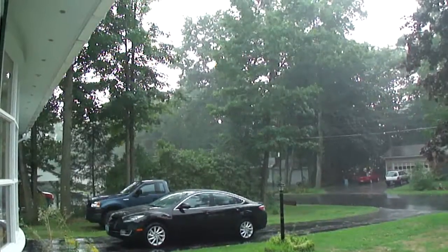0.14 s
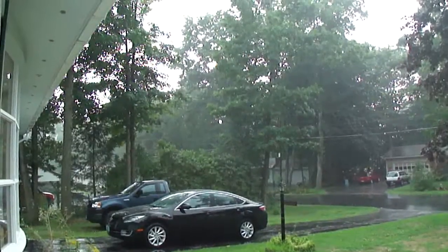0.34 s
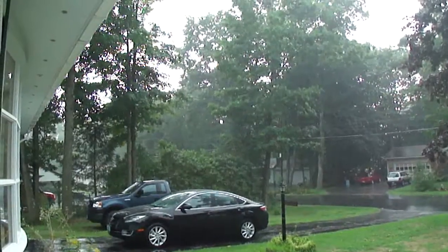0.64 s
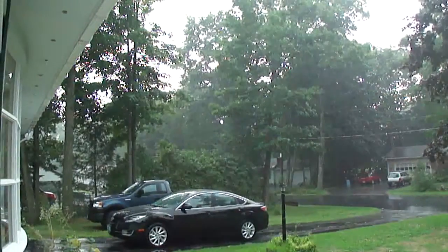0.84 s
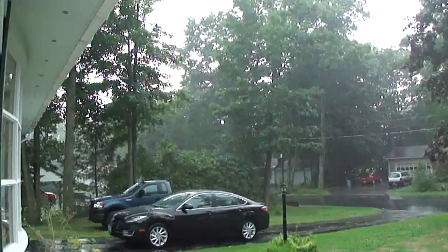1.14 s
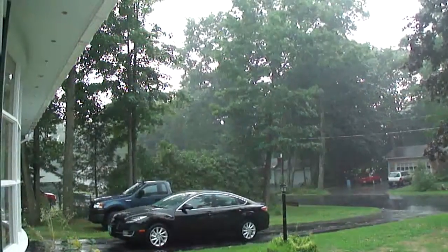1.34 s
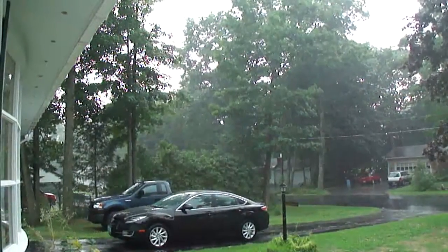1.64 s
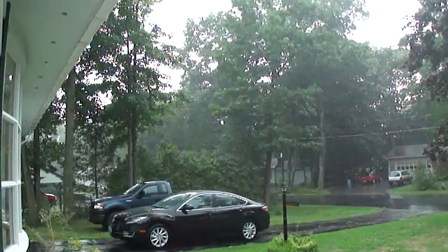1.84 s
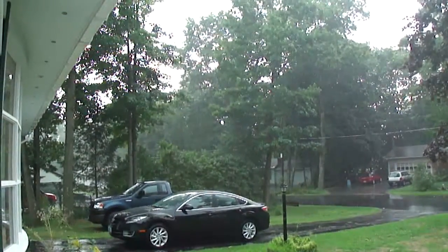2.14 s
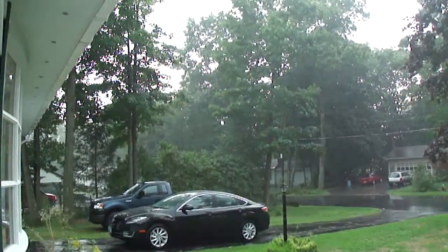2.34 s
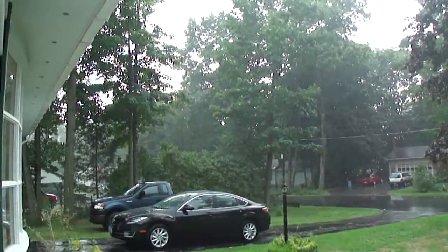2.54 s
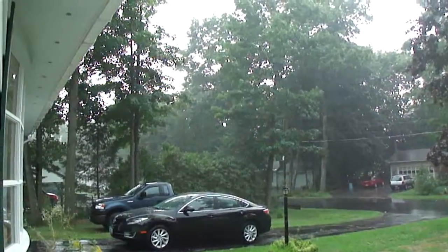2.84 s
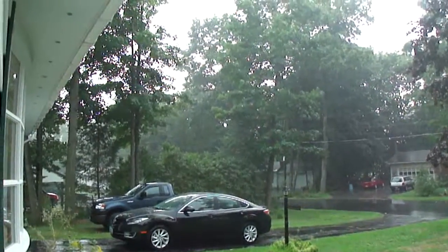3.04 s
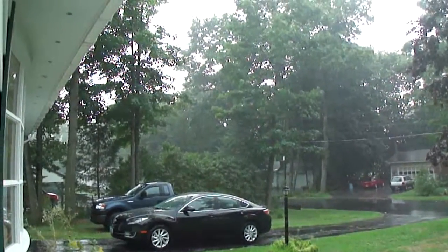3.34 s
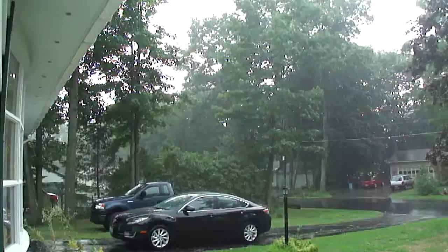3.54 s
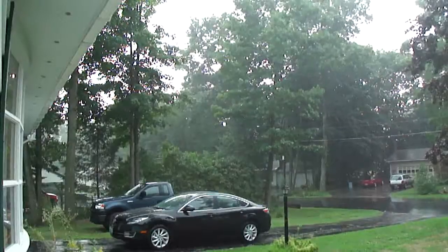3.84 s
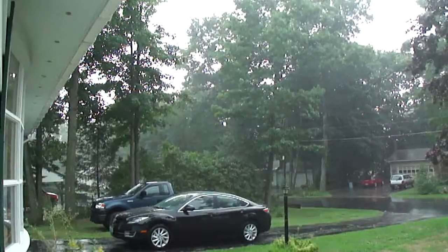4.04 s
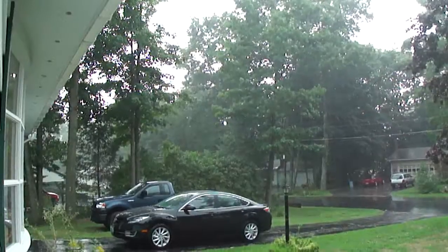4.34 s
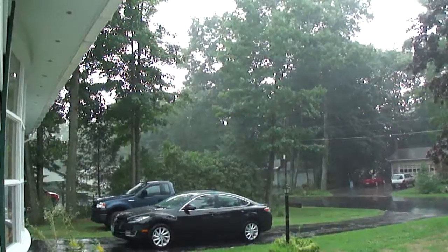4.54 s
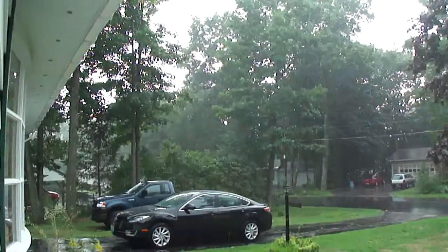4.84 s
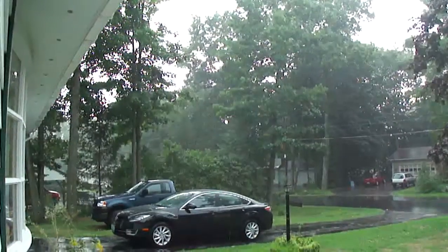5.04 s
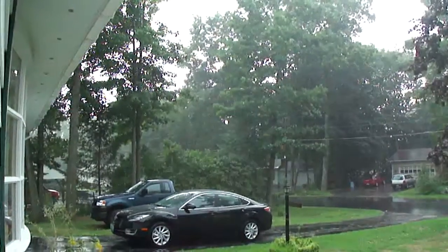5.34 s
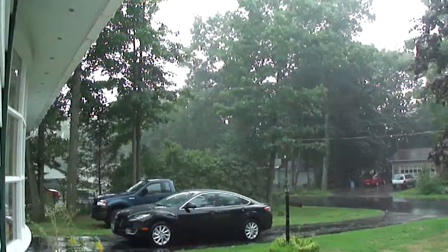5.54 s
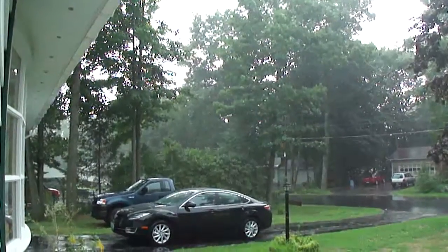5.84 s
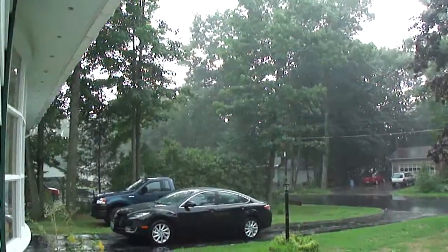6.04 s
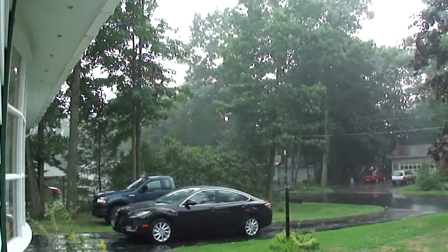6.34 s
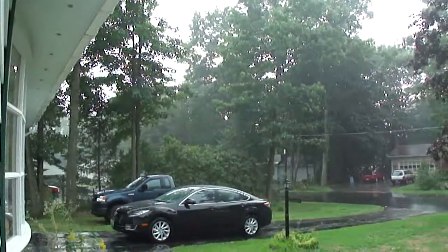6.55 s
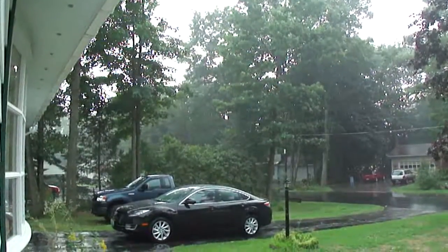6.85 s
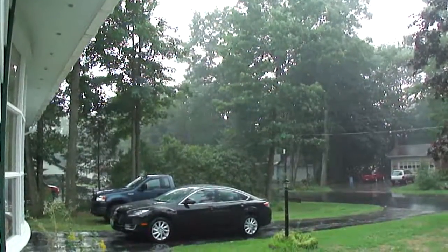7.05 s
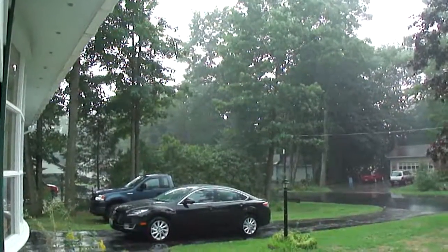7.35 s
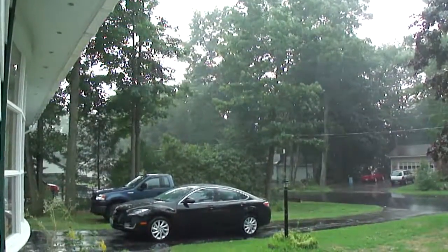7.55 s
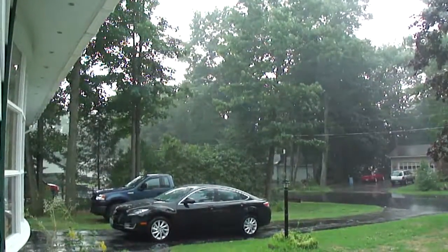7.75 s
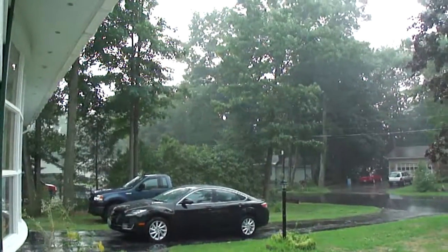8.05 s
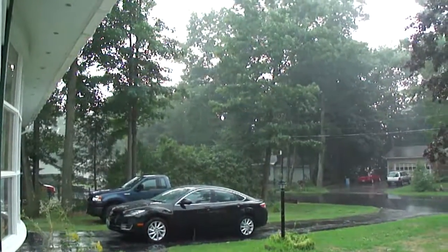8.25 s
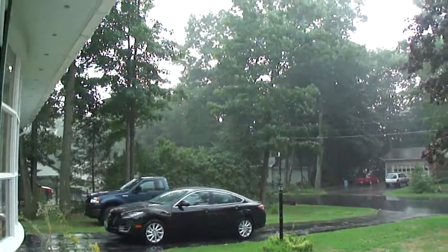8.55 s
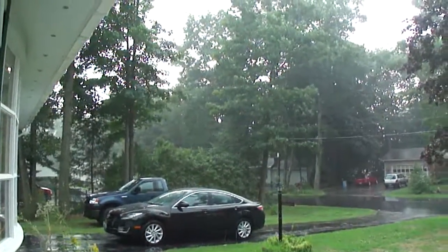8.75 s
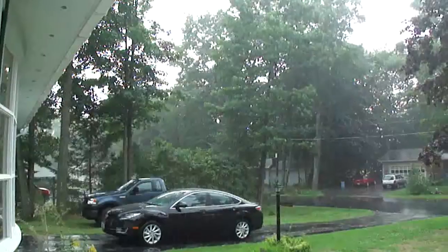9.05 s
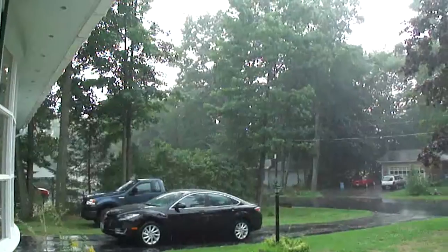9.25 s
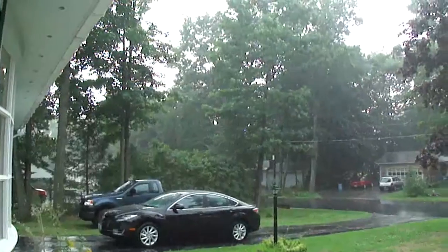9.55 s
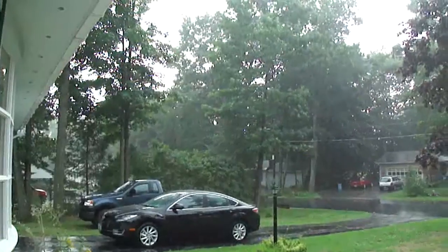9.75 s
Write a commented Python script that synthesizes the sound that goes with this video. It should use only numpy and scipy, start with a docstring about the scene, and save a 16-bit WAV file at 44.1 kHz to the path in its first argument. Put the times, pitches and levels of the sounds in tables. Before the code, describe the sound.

A steady heavy downpour on trees, lawn and driveway, heard from under a house eave. Fat drops from the roof edge smack and ping close to the microphone, thick in the first three seconds, sparser afterwards. Faint distant thunder fades near the start; one loud hollow knock comes just after seven seconds, then the rain thickens and low thunder faintly returns.

```python
"""Heavy rain on trees, a lawn and a driveway, heard from under the eave of a house: a roar and a hiss
of shaped noise, with single drops ticking on the driveway.
Fat drops fall close by from the roof edge: smacks, pings and spray, with short answers from wall and eave.
Some heavy drops knock on something hollow; others plop into standing water and ring a bubble.
Far thunder, slow low noise, rolls faintly at the start and again late, as the downpour thickens."""
import sys
import numpy as np
from scipy import signal
from scipy.fft import rfft, irfft, next_fast_len
from scipy.io import wavfile
from scipy.ndimage import map_coordinates

SR = 44100
rng = np.random.default_rng(int(sys.argv[2]) if len(sys.argv) > 2 else 0)


def put_to_file(sound):
    """Save the sound as 16-bit audio at rate SR, in the file named by the first command-line argument."""
    columns = np.atleast_2d(sound).T  # one column per channel
    safe = np.clip(columns, -1, 1)
    whole_steps = np.round(safe * 32767)
    wavfile.write(sys.argv[1], SR, whole_steps.astype(np.int16))


N = 436149  # length in samples

# strength of the downpour, of which only the change about its mean counts: time_s, strength_db
DOWNPOUR_STRENGTH = [(0.0, -34), (1.76, -34), (2.24, -35), (7.33, -34.5), (7.69, -33.5), (9.05, -33)]
# spectrum shape of the rain: freq_hz, density_db (per Hz, relative)
RAIN_SPECTRUM = [(15, -70), (25, -42), (64, -23.5), (140, -15), (227, -8), (440, -5), (749, -0.5),
                 (873, -1.5), (1180, -2), (1410, -0.5), (1560, -1), (1970, -1.5), (3900, -8.5), (6810, -20),
                 (10800, -34), (14000, -136), (22000, -120)]
# broad resonances between wall and eave: centre_hz, width_hz, gain_db
PORCH_RESONANCES = [(272, 99, 2.5), (671, 25, 3.5), (758, 41, 3), (1167, 156, 3.5), (1403, 76, -3),
                    (1580, 230, 1.5), (1926, 320, -3), (2200, 140, 1)]
# treble from splashing on the driveway, before the patter's overall gain: time_s, level_db
DRIVEWAY_SPLASHING = [(0.0, -52), (0.72, -54), (6.39, -50.5), (9.56, -48), (9.89, -46.5)]
# spectrum shape of the drops on the driveway: freq_hz, gain_db (relative)
PATTER_SPECTRUM = [(300, -31), (1000, -4), (3000, 8), (6000, -1.5), (11000, -19)]
# rolls of far thunder: crest_s, level_db, swell_db_per_s
THUNDER_ROLLS = [(.5, -48.5, 1), (9.8, -53.5, 1.5)]
# spectrum shape of the thunder: freq_hz, gain_db (relative)
THUNDER_SPECTRUM = [(25, -26), (70, -12.5), (160, -2.5), (260, 1), (600, -50)]
# fattest drops from the roof edge, levels before the trims in drips():
# start_s, smack_db, smack_hz, ping_db, ping_hz, spray_db, dip_db (of the background; negative lifts it)
ROOF_EDGE_DROPS = [(.048, -23, 6600, -34, 6500, -33, 0), (.08, -22, 5800, -32, 6300, -33, 1),
                   (0.1188, -10, 3500, -19, 4450, -25, 4), (.2368, -19, 5660, -20, 4850, -35, 0),
                   (.467, -29, 9500, -42, 8000, -32, 1), (.767, -28, 9000, -40, 8000, -31, 4.5),
                   (.834, -18, 5700, -29, 5800, -28, 4.5), (1.0002, -13, 4100, -20, 4480, -27, -0.5),
                   (1.063, -24, 4700, -26, 4850, -35, 1.5), (1.397, -8, 3000, -11, 2210, -21, 2.5),
                   (1.699, -25, 8000, -36, 8000, -28, -0.5), (1.9441, -9.5, 2950, -12.5, 2150, -19, -0.5),
                   (2.1233, -24, 3200, -18, 3070, -17, 1), (2.2153, -12, 3300, -24, 4240, -20, 0),
                   (2.291, -8.5, 2780, -12, 2270, -26, 1.5), (2.33, -13, 4870, -17, 4700, -29, -1.5),
                   (2.374, -14.5, 4270, -17, 3420, -27, 2), (2.392, -27, 8800, -40, 8000, -33, 0),
                   (2.443, -19, 5600, -36, 7700, -21, 4), (2.642, -22, 6800, -31, 6500, -36, 1),
                   (2.877, -19.5, 4900, -29, 5200, -36, -2), (3.12, -16, 3700, -16, 3730, -38, -2),
                   (3.149, -12.5, 3100, -26, 3100, -23, 0.5), (3.365, -25, 6500, -32, 6500, -37, 0),
                   (3.843, -22, 4800, -32, 4800, -31, -1), (3.967, -26, 6270, -28, 6700, -36, -0.5),
                   (4.243, -22, 6200, -33, 7000, -28, 0), (4.78, -27, 9000, -40, 8500, -31, 1),
                   (4.926, -24, 5800, -30, 6400, -39, 0), (4.963, -23, 5300, -32, 4300, -24, 0),
                   (5.084, -18, 4470, -19, 4700, -34, 1.5), (5.735, -16, 2800, -20, 2500, -25, 0),
                   (5.974, -23, 4500, -30, 5000, -32, 0), (7.257, -16, 2800, -23, 2930, -24, 0.5),
                   (7.54, -24, 7000, -24, 6400, -32, -0.5), (7.876, -17.5, 3000, -31, 3000, -36, 0),
                   (8.124, -18, 4200, -24, 4500, -24, 0), (8.295, -24, 6500, -31, 6500, -34, 0.5),
                   (8.49, -20, 6500, -31, 6800, -33, -0.5), (8.543, -13, 4160, -28, 4700, -32, 3.5),
                   (8.582, -19, 4000, -18.5, 3450, -23, 0.5), (8.889, -20, 4700, -24, 4900, -35, -0.5),
                   (9.203, -22, 8000, -35, 8500, -18.5, 7), (9.246, -22, 6000, -24, 5500, -26, 4),
                   (9.364, -17.5, 6100, -24, 6300, -31, 1.5), (9.538, -16, 5200, -26, 5200, -22, 1),
                   (9.778, -24, 6400, -34, 6400, -32, 0), (9.83, -16, 4330, -23, 4600, -33, -0.5)]
# paths from the drip line, the first two off-axis and dull, before facing gain and a slight delay jitter:
# delay_s, gain_db, treble_edge_hz
DRIP_LINE_PATHS = [(0, -2.5, 4400), (.0021, -1.5, 4100), (.0048, -2, 9000), (.0056, 2.5, 9500),
                   (.0062, -9.5, 10000), (.0068, -2.5, 10000), (.0079, -6, 9000)]
# heavy drops on something hollow, levels before the trims in knock(): start_s, level_db, smack_hz
HOLLOW_KNOCKS = [(0.1178, -15.5, 1600), (7.1128, 1.5, 2090)]
# modes of the hollow thing, relative to its smack: pitch_hz, level_db, t60_s
HOLLOW_MODES = [(1110, -12.5, 0.015), (1680, -16, 0.0057), (2270, -8, 0.021), (2720, -20, .014),
                (4700, -8, 0.0063), (4950, -31, .06)]
# drops into standing water, levels before the eave: start_s, level_db, bubble_hz, t60_s
WATER_PLOPS = [(.196, -25, 1210, .08), (8.02, -23, 1070, .03), (8.032, -20, 800, .015)]

ROAR_DB, HISS_DB = -33, -35.5  # each layer at the mean strength, before wobble and dips
THUNDER_FADE_DB_PER_S = 9
# lesser drops from the roof edge: mean levels before the trims in drips(), and the pitch at mean size
SMALL_PER_S, SMALL_DB, SMALL_HZ, SMALL_PING_DB, SMALL_SPRAY_DB = 10, -30.5, 6600, -40, -42
SMALL_SPREAD_DB, SMALL_OCTAVES_PER_DB = 4, .11  # the bigger the drop, the lower its pitch
DIP_DELAY_S, DIP_RECOVERY_S = .011, 0.049
TOP_HZ = 11050  # upper band limit at the microphone


def amp(db):
    """Decibels to gain."""
    return 10 ** (np.asarray(db) / 20)


def unit(x):
    """x at rms 1."""
    return x / np.sqrt(np.mean(x ** 2) + 1e-20)


def along(points, hz):
    """Value at hz from (Hz, value) points on a log axis."""
    freqs, values = np.transpose(points)
    return np.interp(np.log(hz + 1), np.log(freqs + 1), values)


def curves(rows):
    """One value per sample for each column after the time."""
    times, *columns = np.transpose(rows)
    return [np.interp(np.arange(N) / SR, times, column) for column in columns]


def wobble(rate):
    """A smooth random curve, rate knots a second."""
    knots = rng.standard_normal(int(N * rate / SR) + 4)
    return map_coordinates(knots, [np.arange(N) * rate / SR])


def filtered(x, response):
    """x times a response of frequency."""
    size = next_fast_len(len(x) + SR // 10)
    spectrum = rfft(x, size) * response(np.fft.rfftfreq(size, 1 / SR))
    return irfft(spectrum, size)[:len(x)]


def butter(x, order, edge_hz, kind):
    """x through a Butterworth filter."""
    return signal.sosfilt(signal.butter(order, edge_hz, kind, fs=SR, output="sos"), x)


def add(track, start_s, x):
    """Mix x into the track at a time."""
    part = track[max(round(start_s * SR), 0):][:len(x)]
    part += x[:len(part)]


def click(hz, octaves, size):
    """A short blow of peak 1, its energy in a band round hz."""
    edges = np.clip([hz / 2 ** (octaves / 2), hz * 2 ** (octaves / 2)], 100, SR / 2 - 100)
    x = butter(signal.unit_impulse(size), 2, edges, "band")
    return x / np.abs(x).max()


def ring(t, hz, t60, attack=0.00024):
    """A damped mode with a soft start."""
    return np.sin(2 * np.pi * hz * t) * 1000 ** (-t / t60) * (1 - np.exp(-t / attack))


def strength():
    """Strength of the downpour in dB about its mean."""
    level_db, = curves(DOWNPOUR_STRENGTH)
    return level_db - level_db.mean()


def porch(hz):
    """Gain of the broad resonances between wall and eave, which colour the rain."""
    return amp(sum(db / (1 + (2 * (hz - centre) / width) ** 2) for centre, width, db in PORCH_RESONANCES))


def downpour(split_hz=2600):
    """Countless far drops merge into a roar from roof and ground and a hiss from the leaves."""
    strength_db = strength()

    def colour(hz):
        return amp(along(RAIN_SPECTRUM, hz)) * porch(hz)

    def low_share(hz):  # share of the power that goes to the roar
        return 1 / (1 + (hz / split_hz) ** 4)

    roar = unit(filtered(rng.standard_normal(N), lambda hz: colour(hz) * np.sqrt(low_share(hz))))
    hiss = unit(filtered(rng.standard_normal(N), lambda hz: colour(hz) * np.sqrt(1 - low_share(hz))))
    roar_level = amp(ROAR_DB + strength_db + 0.4 * wobble(11))
    hiss_level = amp(HISS_DB + strength_db + 0.45 * wobble(25))
    return roar * roar_level + hiss * hiss_level


def patter(per_second=650, spread_db=3.0, level_db=9.0):
    """Single drops on the driveway: many small ticks, a few larger ones."""
    splash_db, = curves(DRIVEWAY_SPLASHING)
    size = amp(spread_db * np.minimum(rng.exponential(size=N), 4.5))
    ticks = (rng.random(N) < per_second / SR) * size * rng.choice([-1, 1], N)
    t = np.arange(SR // 100) / SR
    # drops land on different things, each kind with its own short splat and pitch
    pitches = np.geomspace(900, 10000, 16)
    kind = rng.integers(0, len(pitches), N)
    sound = np.zeros(N)
    for k, hz in enumerate(pitches):
        burst = rng.standard_normal(len(t)) * 1000 ** (-t / 0.035)
        splat = unit(np.convolve(burst, click(hz, octaves=1.74, size=128)))
        sound += np.sqrt(hz) * signal.oaconvolve(ticks * (kind == k), splat)[:N]
    sound = unit(filtered(sound, lambda hz: amp(along(PATTER_SPECTRUM, hz))))
    return amp(splash_db + level_db) * sound


def thunder():
    """Faint far rolls of low noise that heave as they swell and fade."""
    t = np.arange(N) / SR
    level = np.zeros(N)
    for crest, db, swell in THUNDER_ROLLS:
        below_crest_db = np.maximum(swell * (crest - t), THUNDER_FADE_DB_PER_S * (t - crest))
        level += amp(db - below_crest_db)
    roll = unit(filtered(rng.standard_normal(N), lambda hz: amp(along(THUNDER_SPECTRUM, hz))))
    return roll * level * amp(0.61 * wobble(10))


def eave(hit, facing_db, tail_db, t60):
    """A hit arrives by a few short paths and scatters along the house front; facing_db trims the first two."""
    t = np.arange(len(hit)) / SR
    out = np.zeros(len(hit))
    for k, (delay, db, edge_hz) in enumerate(DRIP_LINE_PATHS):
        dulled = butter(hit, 3, min(edge_hz, SR / 2 - 100), "low")
        add(out, delay + rng.normal(0, .00008), amp(db + facing_db * (k < 2)) * dulled)
    tail = rng.standard_normal(len(t)) * 1000 ** (-t / t60)
    scattered = signal.fftconvolve(hit, tail / np.linalg.norm(tail))
    add(out, DRIP_LINE_PATHS[2][0], amp(tail_db) * scattered)  # from the third path on
    return out


def small_drops():
    """Random lesser drops with the first six columns of ROOF_EDGE_DROPS."""
    when, size, spray = rng.random((round(SMALL_PER_S * N / SR), 3)).T
    size_db = SMALL_SPREAD_DB * (2 * size - 1)
    puff_db = SMALL_SPREAD_DB * (2 * spray - 1)
    pitch = SMALL_HZ * 2 ** (-SMALL_OCTAVES_PER_DB * size_db)
    return list(zip(when * N / SR, SMALL_DB + size_db, pitch,
                    SMALL_PING_DB + size_db, pitch, SMALL_SPRAY_DB + puff_db))


def drips(spray_rise_s=0.00048, spray_t60=0.016, smack_db=-1.5, spray_db=-4.5, ring_db=-2.0,
          ring_cycles=24, low_hz=1600):
    """Each drop gives a short smack, a brief ping of the water it lands in and a puff of fine spray."""
    out, t = np.zeros(N), np.arange(SR // 8) / SR
    for s, db, hz, ping_db, ping_hz, puff_db, *_ in list(ROOF_EDGE_DROPS) + small_drops():
        smack = amp(db + smack_db) * click(hz, octaves=0.91, size=len(t))
        ping = amp(ping_db + ring_db) * ring(t, ping_hz, ring_cycles / ping_hz, attack=0.00011)
        spray = rng.standard_normal(len(t)) * 1000 ** (-t / spray_t60) * (1 - np.exp(-t / spray_rise_s))
        spray = amp(puff_db + spray_db) * butter(spray, 2, [2500, 8500], "band")
        hit = butter(smack + ping + spray, 4, low_hz, "high")
        add(out, s, eave(hit, facing_db=2.5, tail_db=-1.0, t60=0.16))
    return out


def dips():
    """The background dips briefly after some close drops, or lifts a little: a sudden step, a smooth return."""
    t = np.arange(N) / SR - DIP_DELAY_S
    total_db = np.zeros(N)
    for s, *_, db in ROOF_EDGE_DROPS:
        total_db += db * (t > s) * np.exp(-((t - s) / DIP_RECOVERY_S) ** 2)
    return amp(-total_db)


def knock(low_hz=700, crack_db=-20, splash_db=-28, splash_t60=0.089):
    """Heavy drops rap on something hollow, too small to radiate bass: smack, thin crack, modes and splash."""
    out, t = np.zeros(N), np.arange(SR // 6) / SR
    modes = sum(amp(db) * ring(t, hz, t60) for hz, db, t60 in HOLLOW_MODES)
    for s, db, hz in HOLLOW_KNOCKS:
        # the crack comes straight to the microphone
        add(out, s, amp(db + crack_db) * click(6000, octaves=1.5, size=len(t)))
        smack = click(hz, octaves=0.85, size=len(t))
        splash = signal.fftconvolve(rng.standard_normal(len(t)), click(2600, octaves=1.4, size=256))[:len(t)]
        splash = amp(splash_db) * unit(splash) * 1000 ** (-t / splash_t60)
        body = butter(smack + modes + splash, 3, low_hz, "high")
        add(out, s, eave(amp(db - 10.0) * body, facing_db=7.5, tail_db=-0.5, t60=0.18))
    return out


def small_plops(per_second=5, level_db=-28, spread_db=3, centre_hz=1100, octaves=0.69, cycles=30):
    """Random lesser plops with the columns of WATER_PLOPS."""
    when, size, pitch = rng.random((round(per_second * N / SR), 3)).T
    hz = centre_hz * 2 ** (octaves * (2 * pitch - 1))
    return list(zip(when * N / SR, level_db + spread_db * (2 * size - 1), hz, cycles / hz))


def plops(ring_db=-6):
    """Drops plunge into standing water: a dull splash, and the trapped bubble rings."""
    out, t = np.zeros(N), np.arange(SR // 6) / SR
    for s, db, hz, t60 in list(WATER_PLOPS) + small_plops():
        splash = click(hz, octaves=1.5, size=len(t))
        bubble = amp(ring_db) * ring(t, hz, t60, attack=.001)
        add(out, s, eave(amp(db) * (splash + bubble), facing_db=-1, tail_db=-9, t60=.12))
    return out


def scene():
    """Rain and thunder behind, close drops in front, on one channel."""
    background = (downpour() + patter() + thunder()) * dips()
    close_drops = drips() + knock() + plops()
    return (background + close_drops)[None]


def record(dry):
    """The microphone passes nothing above its band limit."""
    return np.array([filtered(channel, lambda hz: hz < TOP_HZ) for channel in dry])


dry = scene()
out = record(dry)
put_to_file(out)
```